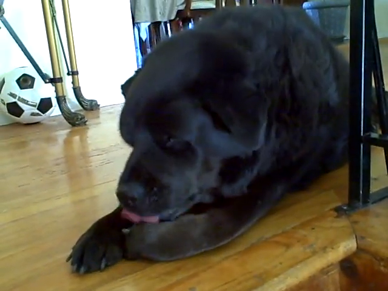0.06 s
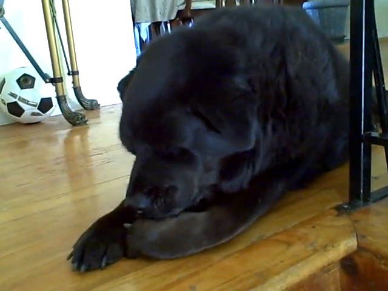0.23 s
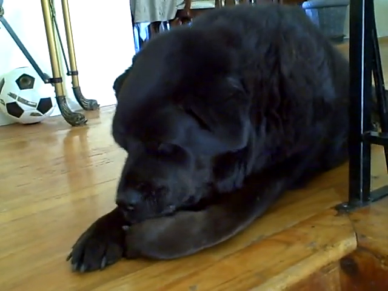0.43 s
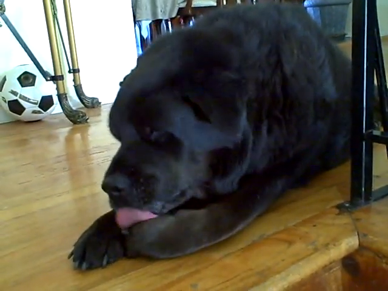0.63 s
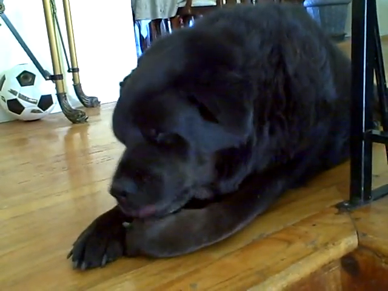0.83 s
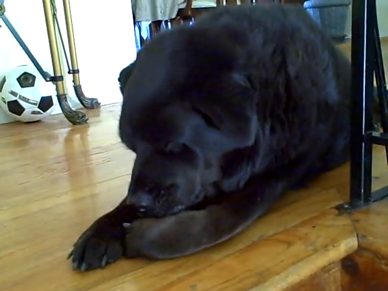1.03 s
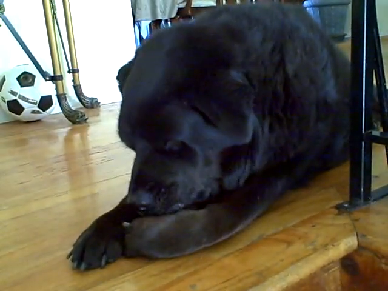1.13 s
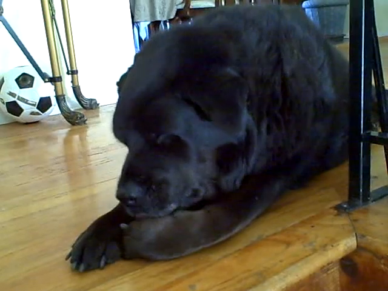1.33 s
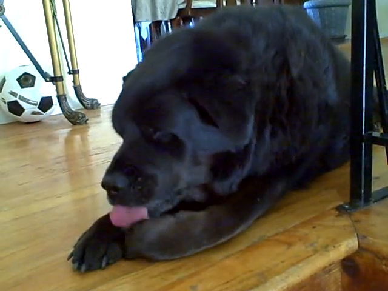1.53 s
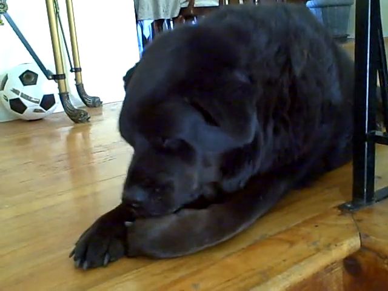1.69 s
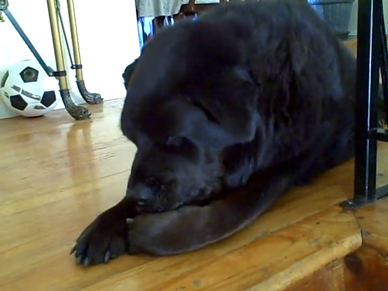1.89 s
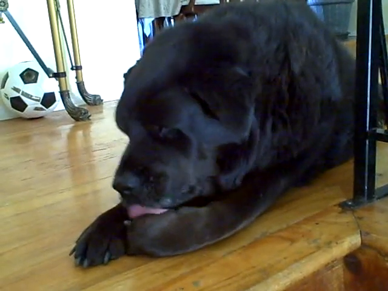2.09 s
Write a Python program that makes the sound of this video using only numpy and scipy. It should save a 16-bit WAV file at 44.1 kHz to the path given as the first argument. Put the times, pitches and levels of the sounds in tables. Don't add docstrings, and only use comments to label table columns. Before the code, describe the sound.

Loud cracking thumps on a wood floor while a dog softly licks its paw indoors

```python
import sys
import numpy as np
from scipy import signal
from scipy.fft import rfft, irfft, next_fast_len
from scipy.io import wavfile
from scipy.ndimage import uniform_filter1d, map_coordinates

SR = 44100
rng = np.random.default_rng(int(sys.argv[2]) if len(sys.argv) > 2 else 0)


def store_pcm(level_fs):
    pcm = np.round(np.clip(level_fs, -1, 1) * 32767).astype(np.int16)
    wavfile.write(sys.argv[1], SR, np.atleast_2d(pcm).T)


def gain_from_decibels(decibels):
    exponent = np.asarray(decibels, float) / 20
    return 10 ** exponent


N = 94815

# freq_hz [Hz], level_db [dB per Hz]
CRACK_COLOUR = [(710, -59.5), (1200, -9), (1510, -0.5), (2670, -3), (4950, 1), (6370, -3.5), (9000, -22),
                (11700, -70.5), (19800, -120)]


def noise(n):
    return rng.standard_normal(n)


def sine(hz, t):
    return np.sin(2 * np.pi * hz * t)


def unit(x):
    return x / np.sqrt(np.mean(x ** 2) + 1e-20)


def along(points, hz):
    f, v = np.transpose(points)
    return np.interp(np.log(hz + 1), np.log(f + 1), v)


def coloured(x, spectrum):
    m = next_fast_len(len(x) + 8192) // 2 * 2
    level_db = np.maximum(along(spectrum, np.fft.rfftfreq(m, 1 / SR)), -80)
    cepstrum = irfft(np.log(gain_from_decibels(level_db)), m)
    cepstrum[1:m // 2] *= 2
    cepstrum[m // 2 + 1:] = 0
    return irfft(rfft(x, m) * np.exp(rfft(cepstrum)), m)[:len(x)]


def wobble(rate):
    knots = noise(int(N * rate / SR) + 4)
    return map_coordinates(knots, [np.arange(N) * rate / SR])


def add(into, s, x):
    part = into[round(s * SR):][:len(x)]
    part += x[:len(part)]


def reverb(spectrum, stretch=1):
    # freq_hz [Hz], t60_s [s]
    room_decay = [(90, .8), (170, 0.57), (300, 0.6), (1000, 0.48), (4000, 0.49), (8000, 0.39)]
    hz, t, z = signal.stft(unit(coloured(noise(SR), spectrum)), SR, nperseg=512)
    fade_db = -60 * t / along(room_decay, hz)[:, None] / stretch
    return signal.istft(z * gain_from_decibels(fade_db), SR, nperseg=512)[1][:SR]


def hush():
    # freq_hz [Hz], level_db [dB per Hz]
    hush_colour = [(12, -39), (20, 6.5), (119, 2), (209, -7.5), (341, -13.5), (2900, -33.5), (6620, -27.5),
                   (8570, -42.5), (9500, -54), (12400, -99), (20900, -120)]
    hum_hz, hum_db = 197, -59
    drone_hz, drone_db = 102.6, -49.5
    turn = 2 * np.pi * np.arange(N) / SR
    hum = np.sin(hum_hz * turn + 0.92 * wobble(10.4)) * gain_from_decibels(hum_db + 2.8 * wobble(3.3))
    drone = np.sin(drone_hz * turn + 1.9 * wobble(27)) * gain_from_decibels(drone_db + 7 * wobble(8))
    air = unit(coloured(noise(N), hush_colour)) * gain_from_decibels(-45 + 1.5 * wobble(2.57))
    return air + hum + drone


def saliva():
    # start_s [s], peak_db [dB], pitch_hz [Hz], ring [cycles]
    ticks = [(.1185, -33, 7500, 5), (.1228, -36, 7200, 4), (.1815, -38, 7100, 4), (.156, -42, 6400, 6),
             (.170, -48, 2050, 5), (.8635, -42, 5500, 6), (.8732, -27, 4900, 2.5), (.8737, -30, 6500, 3),
             (.8805, -42, 6000, 3), (.8895, -41, 5800, 3), (.897, -43, 6540, 7), (.9062, -39, 6750, 7),
             (.9135, -41, 6800, 5), (.9177, -24, 6000, 1.6), (.931, -40, 6000, 6), (.9385, -40, 6600, 5),
             (.945, -39, 6300, 7), (.952, -43, 6300, 5), (1.1008, -39, 3100, 2), (1.1015, -39, 6000, 3),
             (1.1085, -46, 5500, 5), (1.1373, -41, 5500, 3), (1.1465, -41, 5500, 2), (1.1495, -25, 5900, 3),
             (1.1496, -44, 2200, 1.5), (1.153, -31, 5900, 6), (1.176, -41, 4500, 2), (1.176, -48, 750, 4),
             (1.192, -42, 6000, 6), (1.198, -39, 6350, 5)]
    snap_db, room_db = -10, -15
    out, t = np.zeros(N), np.arange(SR // 40) / SR
    for start_s, peak_db, pitch_hz, cycles in ticks:
        u = t * pitch_hz / cycles
        ring = u * np.exp(1 - 2.2 * u) * 2.2 * sine(pitch_hz, t)
        snap = gain_from_decibels(snap_db) * (2 / cycles) ** 2 * noise(len(t)) * np.exp(-t / .0005)
        add(out, start_s, gain_from_decibels(peak_db) * (ring + snap))
    tail = reverb([(500, -1), (6000, 1.5)])
    tail = tail / np.linalg.norm(tail)
    return out + gain_from_decibels(room_db) * signal.fftconvolve(out, tail)[:N]


def tongue():
    # time_s [s], level_db [dB]
    drag = [(0, -54), (.07, -46.5), (0.139, -57), (.163, -48.5), (0.202, -59), (.24, -51.5), (.55, -60),
            (.78, -42.5), (.84, -55.5), (0.931, -56.5), (1.04, -64.5), (1.18, -54.5), (1.31, -64),
            (1.41, -50), (1.5, -44), (2.05, -69), (2.11, -56), (2.15, -53)]
    # freq_hz [Hz], level_db [dB per Hz]
    fur_colour = [(1470, -29), (2500, -19), (3610, -18.5), (4600, -22.5), (6530, 0), (7680, -11.5),
                  (8830, -13.5), (9500, -45), (12400, -80.5), (20900, -120)]
    grains_per_s, grain_spread_db, smooth_share = 1000, 3.5, 0.5
    happens = rng.random(N) < grains_per_s / SR
    size = gain_from_decibels(grain_spread_db * np.clip(noise(N), -2, 2))
    slips = happens * size * np.sign(noise(N))
    rub = smooth_share * noise(N) + (1 - smooth_share) * unit(slips)
    time_s, level_db = np.transpose(drag)
    pressure_db = np.interp(np.arange(N) / SR, time_s, level_db)
    return unit(coloured(rub, fur_colour)) * gain_from_decibels(pressure_db + 2.2 * wobble(30.14))


def scrapes(out):
    # start_s [s], length_s [s], level_db [dB]
    leads = [
        (.2437, .0047, -22),
        (1.4388, .0019, -17),
    ]
    t = np.arange(SR) / SR
    for start_s, length_s, level_db in leads:
        swell = (t < length_s) * (1.03 + (t / length_s) ** 3)
        add(out, start_s, unit(coloured(noise(SR), CRACK_COLOUR)) * gain_from_decibels(level_db) * swell)


def crack(out, start_s, crack_db, crack_hz):
    # delay_s [s], level_db [dB]
    walls = [
        (.0029, -6),
        (.0075, -19),
        (.0125, -20),
        (.0165, -20),
        (.024, -20),
        (.0278, -12),
        (.0308, -14),
    ]
    hold_s, t60_s, rise_s = 0.0014, 0.006, 0.00024
    second_hz, second_db, grit_db = 4200, -14, -6
    echo_hz, echo_grit_db = 6600, -10
    grit = unit(coloured(noise(SR // 8), CRACK_COLOUR))
    t = np.arange(len(grit)) / SR
    shape = gain_from_decibels(crack_db - 60 * np.maximum(t - hold_s, 0) / t60_s) * (1 - np.exp(-t / rise_s))
    shake = uniform_filter1d(grit, size=9)
    whistle = np.sin(2 * np.pi * crack_hz * t + 0.4 * shake)
    second = gain_from_decibels(second_db) * sine(second_hz, t)
    add(out, start_s, shape * (whistle + second + gain_from_decibels(grit_db) * grit))
    echo_whistle = np.sin(2 * np.pi * echo_hz * t + 0.51 * shake)
    for k, (delay_s, level_db) in enumerate(walls):
        echo = echo_whistle + gain_from_decibels(echo_grit_db) * np.roll(grit, 400 * (k + 1))
        add(out, start_s + delay_s, gain_from_decibels(level_db + rng.normal(0, 1)) * shape * echo)


def floor_thud(out, start_s, thud_db, bass_db):
    # pitch_hz [Hz], level_db [dB], t60_s [s]
    boards = [(89.12, -12.5, 0.77), (94.37, -10, 0.6), (146.2, -2, 0.19), (253.2, -12.5, 0.28),
              (345.5, -8.5, 0.32), (389.2, 3, 0.071), (431, 0.5, .2), (561.3, -7.5, 0.15),
              (642, -19.5, 0.45), (724.8, -20.5, 0.53), (742, -20, 0.61), (788.5, -23, 0.39),
              (921, -18, 0.24), (1188, -25, 0.1)]
    bass_hz = 200
    lag_s, rise_s, shove_s = 0.0016, 0.001, 0.0011
    t = np.arange(SR) / SR
    ring = np.zeros(SR)
    for pitch_hz, level_db, t60_s in boards:
        mode_db = level_db + bass_db * (pitch_hz < bass_hz) + rng.normal(0, 1)
        ring += gain_from_decibels(mode_db - 60 * t / t60_s) * sine(pitch_hz, t)
    ring += gain_from_decibels(12 - 60 * t / 0.026) * sine(345.4, t)
    ring += gain_from_decibels(6.5 + bass_db) * (1 - t / shove_s / 2) * np.exp(-t / shove_s / 2)
    add(out, start_s + lag_s, gain_from_decibels(thud_db - 7.5) * ring * (1 - np.exp(-t / rise_s)))


def room_tail(out, start_s, thud_db, bass_db):
    # freq_hz [Hz], level_db [dB per Hz]
    tail_colour = [(110, -6.5), (400, 2.5), (900, -9.5), (1650, -19), (2300, -22), (5000, -20),
                   (6700, -10.5), (9000, -31)]
    tail_db, late_db, rise_s = -17.5, -22, 0.0017
    mids_per_bass = 0.61
    colour = []
    for hz, db in tail_colour:
        is_mid = 1200 < hz < 5500
        colour.append((hz, db - mids_per_bass * bass_db * is_mid))
    tail = reverb(colour) + gain_from_decibels(late_db) * reverb(colour, stretch=1.66)
    t = np.arange(SR) / SR
    add(out, start_s, gain_from_decibels(thud_db + tail_db) * tail * (1 - np.exp(-t / rise_s)))


def knocks():
    # [dB, extra bass]
    blows = [
        (0.248, -1.5, 6830, 6.5, -4.5),
        (1.4404, -6.5, 6810, -0.5, 0),
        (1.5946, -3.5, 6410, -3, 3),
        (1.7469, -3.5, 6070, 0, 0.5),
    ]
    out = np.zeros(N)
    scrapes(out)
    for start_s, crack_db, crack_hz, thud_db, bass_db in blows:
        crack(out, start_s, crack_db, crack_hz)
        floor_thud(out, start_s, thud_db, bass_db)
        room_tail(out, start_s, thud_db, bass_db)
    return signal.sosfilt(signal.butter(2, 40.7, "high", fs=SR, output="sos"), out)


def scene():
    return (hush() + saliva() + tongue() + knocks())[None]


def band_edge(x, hz):
    return signal.sosfilt(signal.cheby2(10, 60, hz, fs=SR, output="sos"), x)


def overload(x):
    ceiling, knee = 0.7, 18
    return x / (1 + np.abs(x / ceiling) ** knee) ** (1 / knee)


def top_cut(x):
    return signal.sosfilt(signal.butter(12, 17140, fs=SR, output="sos"), x)


def record(dry):
    heard = overload(band_edge(dry, 9800))
    return top_cut(band_edge(heard, 17000))


dry = scene()
out = record(dry)
store_pcm(out)
```